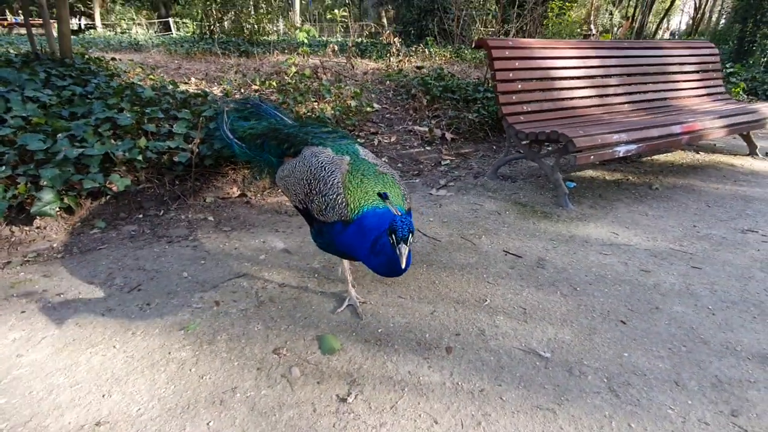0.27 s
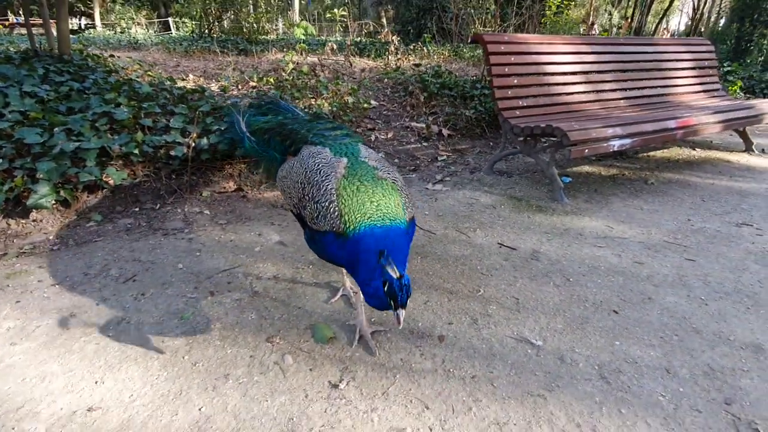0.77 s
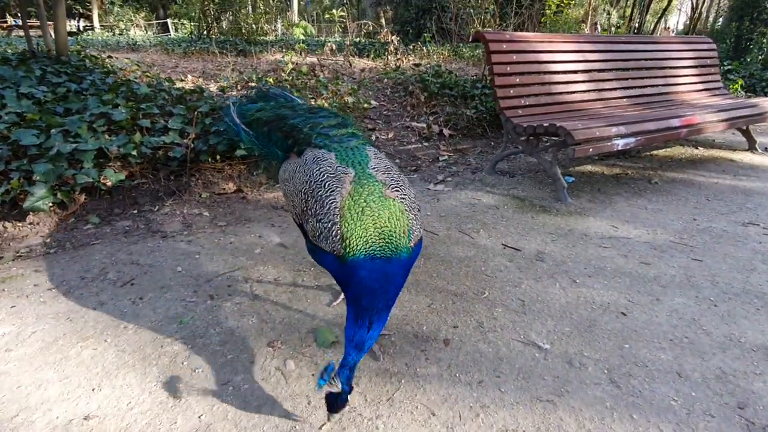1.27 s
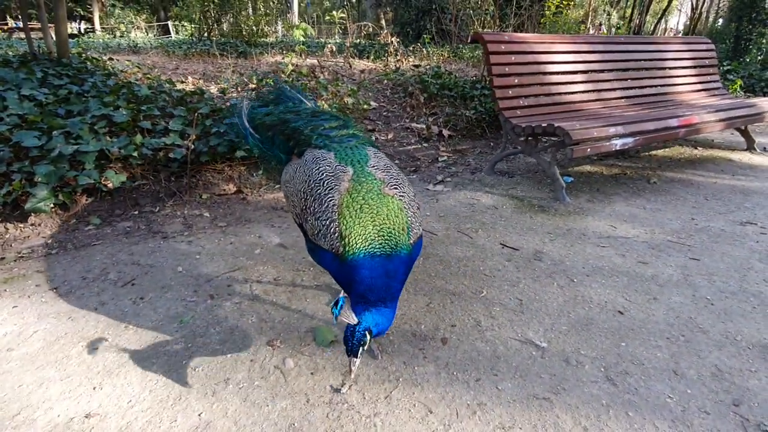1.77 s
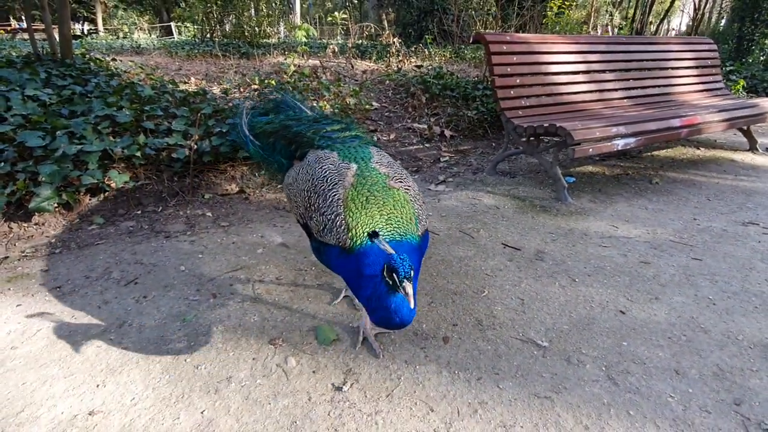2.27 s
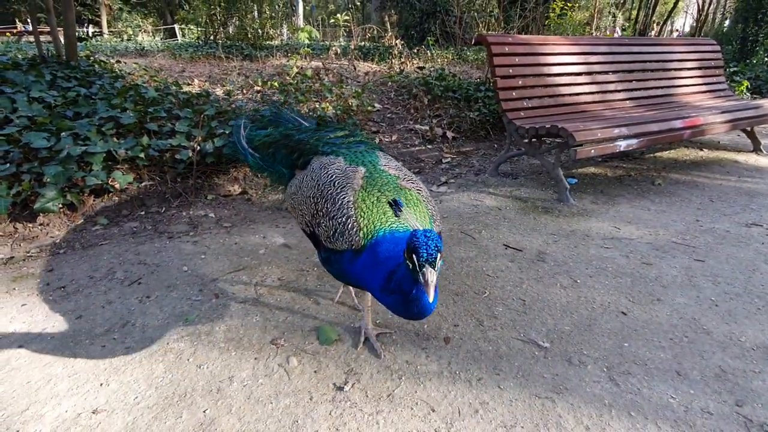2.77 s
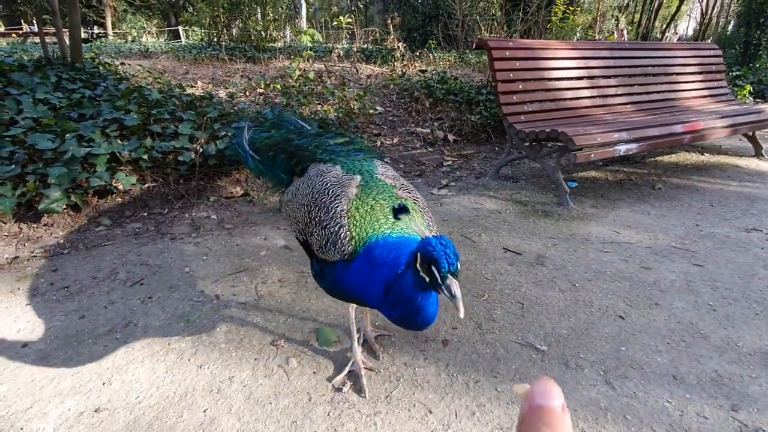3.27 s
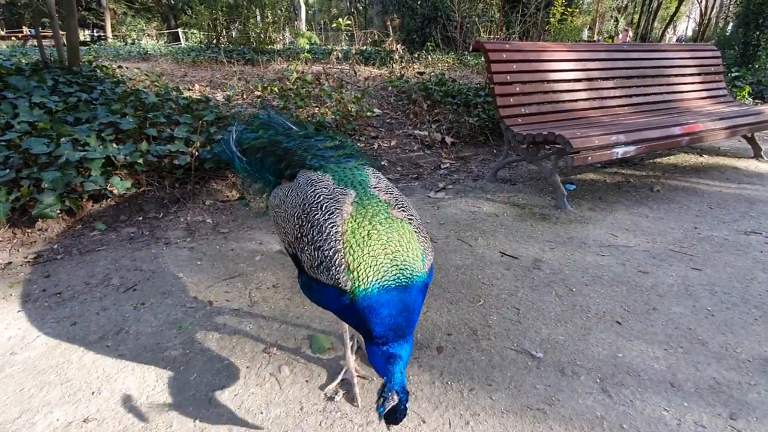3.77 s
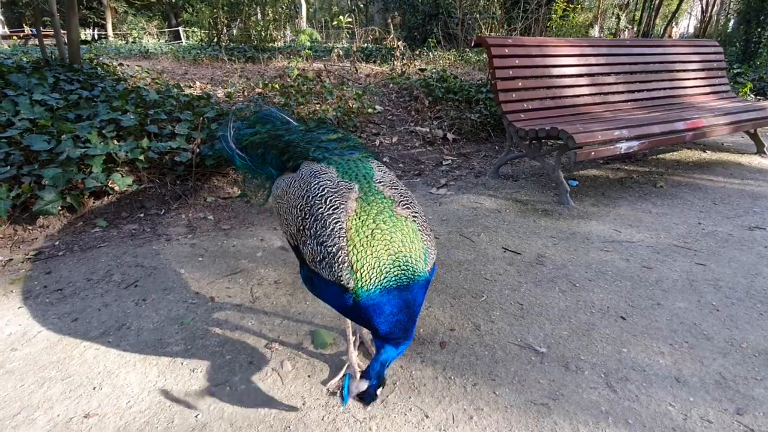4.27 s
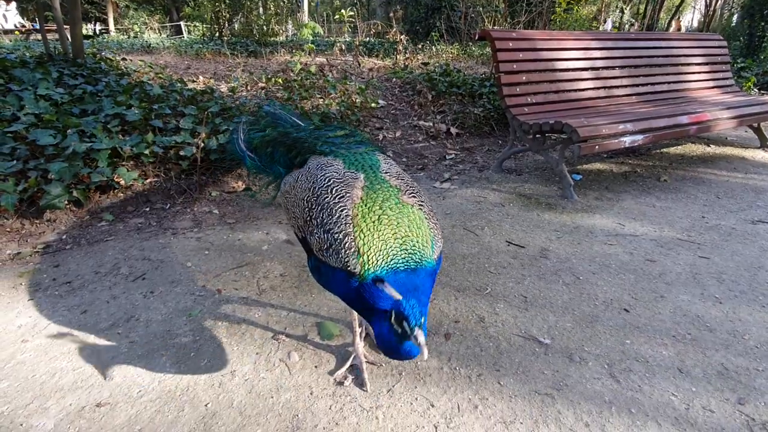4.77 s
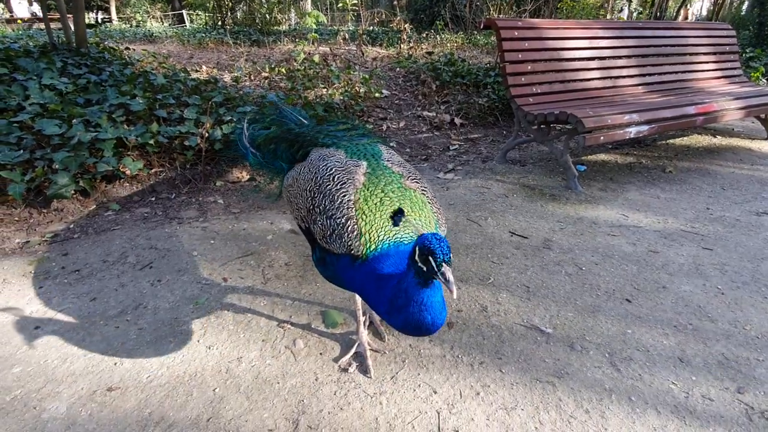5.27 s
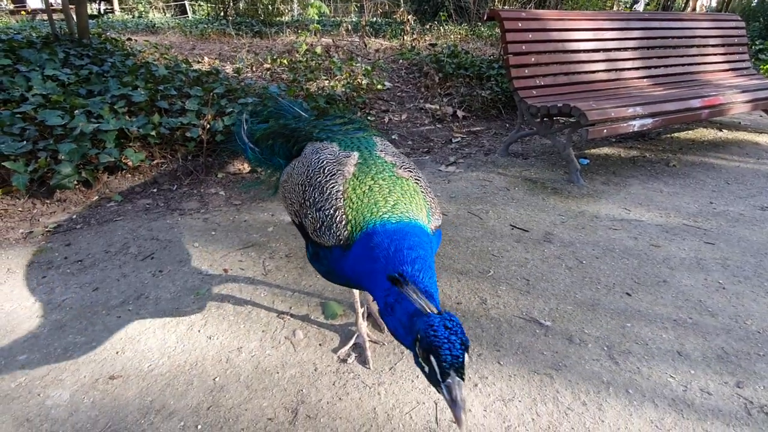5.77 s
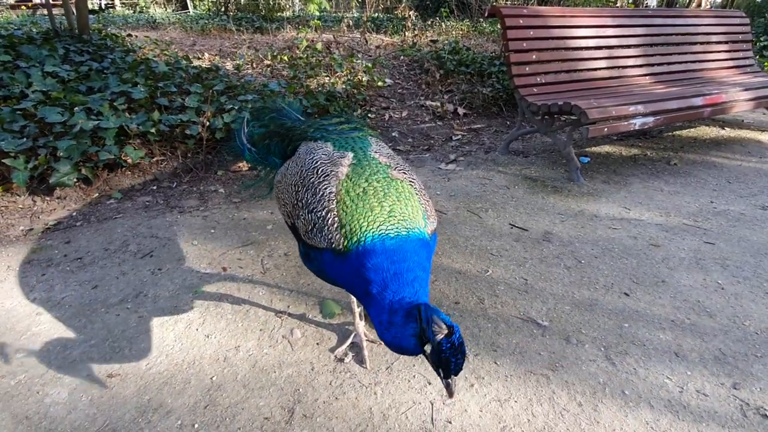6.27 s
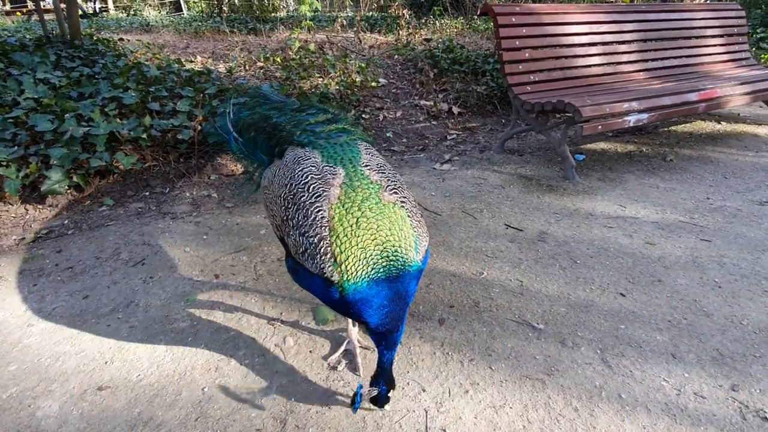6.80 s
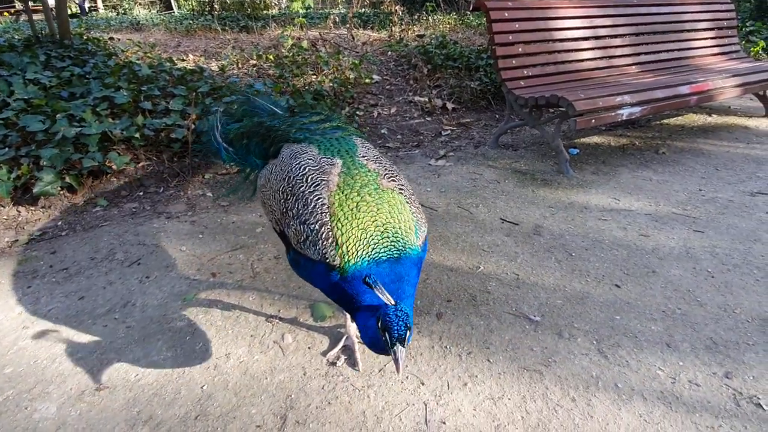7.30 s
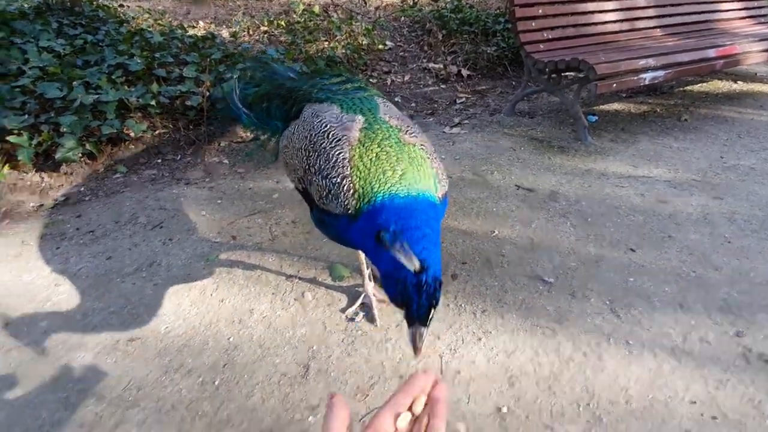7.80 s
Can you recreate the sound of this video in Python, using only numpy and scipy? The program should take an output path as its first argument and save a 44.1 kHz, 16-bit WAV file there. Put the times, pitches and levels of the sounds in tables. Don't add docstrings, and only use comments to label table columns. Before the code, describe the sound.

A calm park path with soft low traffic rumble and faint broad wash throughout, pulsing slightly. From 0 to 0.9 s a sleeve brushes airily close by, leaves stir, and distant small birds give a quick falling trill and short thin notes; a faint claw scrape and grit ticks come around 0.5 to 0.8 s. At 0.98 s one hard, dry nut crack stands out far above everything, with a tiny slap echo. From about 1.6 to 3 s it is quieter. A high chirp drops quickly onto a held pitch at 3.3 s, with a crisp tick at 3.5 s. A short woody beak tap lands at 4.5 s and a similar chirp follows at 5.6 s. Around 6.8 s claws scrape; from 7.2 s rustling swells, and an arching whistle at 7.5 to 7.9 s mixes with clustered seed ticks. Birds carry light tree echo.

```python
import sys
import numpy as np
from scipy import signal
from scipy.fft import rfft, irfft, next_fast_len
from scipy.io import wavfile
from scipy.ndimage import uniform_filter1d

SR = 44100
rng = np.random.default_rng(int(sys.argv[2]) if len(sys.argv) > 2 else 0)


def materialize(psi):
    bounded = np.clip(np.atleast_2d(psi).T, -1, 1)
    quanta = np.round(bounded * 32767).astype(np.int16)
    wavfile.write(sys.argv[1], SR, quanta)


def magnitude_from_level(level_db):
    exponent = np.asarray(level_db, float) / 20
    return 10 ** exponent


N = 354563


def evened(x):
    return x / np.sqrt(np.mean(x ** 2) + 1e-20)


def read(points, hz):
    f, value = np.transpose(points)
    return np.interp(np.log(hz + 1), np.log(f + 1), value)


def trace(curve, t):
    return np.interp(t, *np.transpose(curve))


def follow(curve, calm_db, share):
    return [(s, calm_db + share * db) for s, db in curve]


def add(mix, s, sound, pan_db):
    part = mix[:, round(s * SR):][:, :sound.shape[-1]]
    sides = magnitude_from_level(np.array([[pan_db / 2], [-pan_db / 2]]))
    part += (sides * sound)[:, :part.shape[1]]


def ring(x, hz, width):
    r = np.exp(-np.pi * width / SR)
    poles = [1, -2 * r * np.cos(2 * np.pi * hz / SR), r * r]
    return (1 - r * r) / 2 * signal.lfilter([1, 0, -1], poles, x)


def hiss(shape, level, band, alike, patchy_db, flicker_db, size):
    # pitch_hz, likeness
    likeness = [(30, 0.82), (80, 0.93), (150, 0.96), (300, 0.92), (600, 0.69), (1100, 0.48), (2000, 0.3),
                (3200, 0.076), (6000, 0.039)]
    # pitch_hz, left_minus_right_db
    side_tilt = [(60, -0.5), (150, 0), (380, -2), (950, -2.5), (2380, -3.0), (5980, -7), (15000, -6)]
    lag_s, edge_hz = 0.00031, 15830
    frames, hz = 4 * N // size + 5, np.fft.rfftfreq(size, 1 / SR)
    a, b, c, d, patches = rng.standard_normal((frames, len(hz), 5)).T
    patches = uniform_filter1d(patches, size // 80, 0)
    patches = evened(uniform_filter1d(patches, 8192 // size, 1))
    flicker = rng.standard_normal(frames)

    same = np.clip(alike * read(likeness, hz), 0, 1)[:, None]
    late = np.exp(-2j * np.pi * hz * lag_s)[:, None]
    right = a + 1j * b
    left = same * late * right + np.sqrt(1 - same ** 2) * (c + 1j * d)

    gain = magnitude_from_level(read(shape, hz)) * (hz >= shape[0][0]) * (hz < edge_hz)
    in_band = (hz >= band[0]) & (hz <= band[1])
    inside = (gain[in_band] ** 2).sum() / (gain ** 2).sum()
    z = np.array([left, right]) * gain[:, None] * magnitude_from_level(patchy_db * patches + flicker_db * flicker)
    tilt = read(side_tilt, hz)[:, None] / 2
    z = z * magnitude_from_level(np.array([tilt, -tilt]))
    noise = evened(signal.istft(z, nperseg=size, noverlap=3 * size // 4)[1][:, :N])
    return noise / np.sqrt(inside) * magnitude_from_level(trace(level, np.arange(N) / SR))


def whistle(s, hz, left_db, right_db, flutter_db):
    t = np.arange(s[0], s[-1], 1 / SR)
    flutter = uniform_filter1d(rng.standard_normal((2, SR // 2)), 150)
    flutter = evened(uniform_filter1d(flutter, 150))[:, :len(t)]
    glide = uniform_filter1d(np.interp(t, s, hz), 400, mode="nearest")
    phase = 2 * np.pi * np.cumsum(glide) / SR
    tone = np.sqrt(2) * np.sin(phase + np.array([[0], [1.2]]))
    edge = np.clip(np.minimum(t - s[0], s[-1] - t) / 0.0025, 0, 1)
    level_db = np.array([np.interp(t, s, left_db), np.interp(t, s, right_db)])
    return tone * edge * magnitude_from_level(level_db + flutter_db * flutter)


def swaying(u, hz, db, left_s, period_s, sway_db):
    pan_db = sway_db * np.cos(2 * np.pi * (u - left_s) / period_s) / 2
    return whistle(u, hz, db + pan_db, db - pan_db, flutter_db=4.2)


def traffic():
    # pitch_hz, level_db (per Hz)
    rumble_colour = [(12, -60), (20, -30), (29, -39), (36, -15), (46, -1), (60, 4.5), (74, 1), (103, -7),
                     (156, -19.5), (211, -33), (278, -29), (307, -25), (400, -36.5), (520, -57),
                     (880, -120)]
    wash_colour = [(120, 2), (200, -1), (278, -3.5), (373, -10), (529, -5), (579, -7.5), (683, -6.5),
                   (1160, -7.5), (1500, -11), (1840, -11.5), (2860, -20), (3830, -25.5), (5330, -33),
                   (10500, -44), (16000, -71)]
    # time_s, level_db (over the usual traffic)
    passing = [(0, 0.5), (.6, 3), (.9, -2.5), (1.3, 3), (1.55, -3.5), (2.2, 1), (2.8, -0.5), (3.6, 1.5),
               (4.4, -1), (5.3, 0), (5.9, -2.5), (6.6, 1.5), (7.2, 0.5), (8.04, -0.5)]
    rumble = hiss(rumble_colour, follow(passing, -38, 1), (20, 200),
                  alike=0.98, patchy_db=0.27, flicker_db=0.33, size=4096)
    wash = hiss(wash_colour, follow(passing, -49.02, 0.033), (300, 1500),
                alike=1.0, patchy_db=0.83, flicker_db=0.22, size=1024)
    return rumble + wash


def foliage():
    # pitch_hz, level_db
    leaf_colour = [(900, -23), (1600, -3), (2300, 0), (3500, -2.5), (5000, -5), (7000, -23.5), (8000, -37)]
    flock_colour = [(3500, -7), (5000, -3), (6300, 1), (7500, -2.5), (7900, -9.5), (9300, -8.5),
                    (10500, -24)]
    # time_s, level_db (over calm air)
    breeze = [(0, 5.5), (.2, 7.5), (.56, 6.5), (.9, 1), (1.2, 4), (1.8, -5), (2.5, -5), (3.05, 5.5),
              (3.45, 2.5), (3.7, 5.5), (4.9, -1.5), (5.5, 4), (6.2, -1.5), (6.83, 6.5), (7.1, 2.5),
              (7.3, 9), (7.65, 9), (8.04, 9)]
    leaves = hiss(leaf_colour, follow(breeze, -58, 0.58), (1800, 4500),
                  alike=0.27, patchy_db=2.0, flicker_db=0.65, size=256)
    flock = hiss(flock_colour, follow(breeze, -70.5, 1), (5800, 9500),
                 alike=0.3, patchy_db=0.5, flicker_db=2.5, size=256)
    return leaves + flock


def strokes():
    # start_s, length_s, level_db
    sweeps = [(1.0, .13, -72), (3.09, 0.18, -70), (3.362, 0.086, -72), (3.64, .26, -79), (4.235, .06, -67),
              (5.84, 0.2, -69.5), (6.46, .05, -80), (7.23, .25, -64), (7.897, .06, -66)]
    t = np.arange(N) / SR
    return sum(magnitude_from_level(db - 4.5 * (t - s) / length)
               * np.clip(np.minimum((t - s) / 0.004, (s + length - t) / 0.02), 0, 1)
               for s, length, db in sweeps)


def sleeve():
    # pitch_hz, level_db
    cloth_colour = [(3000, -25), (6000, -1), (8000, -5), (10000, -0.5), (12000, -2), (15800, -9)]
    # time_s, level_db
    arm = [(0, -72), (.11, -61.5), (.31, -65.5), (.42, -62.5), (.71, -72), (1.12, -80), (1.92, -91),
           (2.6, -91), (2.93, -76), (3.09, -69), (3.4, -82), (3.74, -78), (4.57, -90), (5.06, -86),
           (5.96, -81.5), (6.9, -82), (7.43, -64), (8.04, -69)]
    cloth = hiss(cloth_colour, [(0, 0)], (9000, 15500), alike=0.3, patchy_db=0.6, flicker_db=1.8, size=256)
    brushing = magnitude_from_level(2.5 + trace(arm, np.arange(N) / SR))
    return np.hypot(brushing, strokes()) * cloth


def far_birds():
    # length_s, level_db
    trill = [(.026, -57), (.026, -58), (.026, -57), (.014, -59)]
    # start_s, length_s, first_hz, last_hz, level_db
    drops = [(.001, .026, 5240, 4600, -58), (0.043, 0.036, 3080, 2730, -52), (.907, .022, 7000, 6300, -58),
             (1.493, 0.024, 4080, 3760, -59), (7.09, .03, 7850, 7650, -68), (7.12, 0.026, 7500, 6700, -63),
             (7.29, .025, 7850, 7600, -63), (7.303, .02, 7600, 6900, -66), (0.214, .11, 2200, 2510, -68)]
    # start_s, length_s, pitch_hz, level_db,
    # left_minus_right_db
    holds = [(.2, .016, 4350, -62, -7), (.085, .14, 2660, -58, -3), (.3, .059, 2650, -61, -2),
             (.505, .093, 3210, -60, 0), (.625, .035, 2840, -57, -6), (.709, .084, 2660, -61, -10),
             (.9, .055, 3100, -59, 0), (.931, .045, 2250, -58, -2), (1.042, .15, 2320, -63, -8),
             (.93, .049, 6550, -68, -8), (1.03, .06, 2700, -62, 1), (1.45, .015, 8600, -73, -5),
             (6.186, .045, 7450, -77, -10), (6.355, .04, 6250, -66, -5), (6.43, .02, 5450, -70, -3),
             (7.177, .074, 2720, -57, -2), (7.253, .024, 2380, -54, -2), (6.797, .045, 2960, -55, -3),
             (6.905, .05, 2200, -58, -3), (6.845, .02, 1800, -55, -3)]
    trill_s, step_s, top_hz, fall_hz_per_s = 0.085, 0.088, 5650, 52000
    notes = [(trill_s + k * step_s, length, top_hz, top_hz - fall_hz_per_s * length, db, -10)
             for k, (length, db) in enumerate(trill)]
    notes += [(s, length, first, last, db, -3) for s, length, first, last, db in drops]
    droop = 0.013
    notes += [(s, length, hz, (1 - droop) * hz, db, pan_db) for s, length, hz, db, pan_db in holds]
    out = np.zeros((2, N))
    for s, length, first_hz, last_hz, db, pan_db in notes:
        note = whistle((s, s + length), (first_hz, last_hz), (db, db), (db, db), flutter_db=2.5)
        add(out, s, note, pan_db)
    return out


def near_birds():
    # after_start_s, level_db
    effort = [(0, -6), (.018, 1), (.045, -13), (.11, -4), (.17, -1), (.205, 2), (.235, -9), (.33, -12),
              (.4, -16)]
    # start_s, level_db, drop_hz, first_strongest_left_s, sway_period_s
    chirps = [
        (3.265, -52, 650, 0.1, 0.2),
        (5.636, -51.5, 443, 0.075, 0.137),
    ]
    # time_s, pitch_hz, level_db
    arch = [(7.53, 2900, -62), (7.585, 3570, -52), (7.615, 3780, -55), (7.672, 3806, -55),
            (7.695, 3650, -51), (7.72, 3354, -49), (7.745, 3086, -48.5), (7.8, 2966, -53),
            (7.87, 2900, -68)]
    # first_strongest_left_s, sway_period_s, sway_db
    arch_sway = (.05, 0.074, 5.8)
    held_hz, sag_from_hz, sag_hz_per_s, drop_s = 4852, 5434, 3200, 0.017
    out = np.zeros((2, N))
    u = np.arange(0, effort[-1][0], 0.002)
    for s, db, drop_hz, left_s, period_s in chirps:
        sag_hz = np.maximum(sag_from_hz - sag_hz_per_s * u, held_hz)
        hz = sag_hz + drop_hz * np.exp(-u / drop_s)
        add(out, s, swaying(u, hz, db + trace(effort, u), left_s, period_s, sway_db=6), 0)
    s, arch_hz, arch_db = np.transpose(arch)
    t = np.arange(s[0], s[-1], 0.002)
    add(out, s[0], swaying(t - s[0], np.interp(t, s, arch_hz), np.interp(t, s, arch_db), *arch_sway), 0)
    return out


def ticks():
    # start_s, peak_db, ring_hz, snap_db, left_minus_right_db
    seeds = [(.59, -38, 2000, -63, -9), (0.674, -48, 6000, -58, -6), (.691, -42, 2600, -59, -6),
             (.733, -48, 6000, -60, -6), (.802, -39.5, 4270, -59, -19), (1.21, -54, 3500, -65, -6),
             (1.514, -53, 7000, -66, -4), (3.132, -52, 4000, -51, -2), (3.363, -67, 9000, -65, -8),
             (3.5313, -37, 4400, -37.5, -4), (4.237, -43, 5000, -60, -6), (6.292, -39.5, 4280, -47, -2),
             (6.47, -54, 7000, -65, -4), (6.889, -44, 3000, -61, -3), (7.087, -54, 7500, -60, -3),
             (7.697, -50, 2500, -43, 2), (7.706, -36, 5860, -45, -4), (7.727, -34.5, 5770, -42, -11),
             (7.727, -34, 2250, -52, -1), (7.805, -35, 4850, -50, -5), (7.813, -38, 2300, -63, 1),
             (7.826, -40, 4600, -37, -2), (8.022, -46, 5500, -41, -6)]
    out, t = np.zeros((2, N)), np.arange(600) / SR
    bursts = rng.standard_normal((len(seeds), 2, len(t))) * (1 - np.exp(-t / 0.00013))
    for (s, db, hz, snap_db, pan_db), burst in zip(seeds, bursts):
        burst = burst + 0.68 * burst[::-1]
        width = 750 + 0.15 * hz
        body = ring(ring(burst * np.exp(-t / 0.003), hz, width), hz, 2 * width)
        snap = ring(burst * np.exp(-t / 0.0013), 6000, 14000)
        add(out, s, magnitude_from_level(db) * body / abs(body).max() + magnitude_from_level(snap_db) * snap / abs(snap).max(), pan_db)
    peck_s, peck_db, peck_hz, peck_t60_s = 4.5198, -22.5, 1250, 0.0049
    tap = magnitude_from_level(peck_db - 60 * t / peck_t60_s) * np.sin(2 * np.pi * peck_hz * t)
    add(out, peck_s, tap * (1 - np.exp(-t / 0.00022)), -3)
    return out


def claw():
    # start_s, length_s, grit_db, squeal_hz, squeal_db
    scrapes = [(.5, .11, -53, 4700, -60), (6.792, .08, -52, 2930, -50), (6.795, .08, -58, 5400, -61),
               (6.86, .08, -60, 2900, -64), (4.22, .06, -56, 2300, -68), (7.28, .09, -59, 2400, -66),
               (7.09, .09, -68, 7300, -70)]
    # pitch_hz, width_hz, level_db
    stone = [(2000, 480, -2), (3660, 710, -1), (5200, 900, 0.5), (6200, 620, -2.5)]
    out = np.zeros((2, N))
    for s, length, grit_db, hz, squeal_db in scrapes:
        count = round(length * SR)
        slips = rng.standard_normal((2, SR // 4)) * (rng.random((2, SR // 4)) < 3000 / SR)
        slips = slips[:, :count]
        grit = sum(magnitude_from_level(db) * evened(ring(ring(slips, mode_hz, width), mode_hz, width))
                   for mode_hz, width, db in stone)
        squeal = evened(ring(ring(slips, hz, 170), hz, 170))
        scrape = magnitude_from_level(grit_db) * evened(grit) + magnitude_from_level(squeal_db) * squeal
        add(out, s, scrape * signal.windows.tukey(count, 0.3), -3)
    return out


def nut():
    # pitch_hz, t60_s, left_db, right_db, sign
    modes = [(714, .0035, -11, -1.5, 1), (1184, .0033, 4.5, 4, 1), (1889, .0061, -40, 0, 1),
             (2019, .0032, 8.8, 13.6, -1), (2606, .0042, -30, 3.6, 1), (1100, .02, -27, -30, 1),
             (2250, .013, -17, -22, 1), (3700, .004, -16, -12, 1), (5050, .004, -19, -15, -1),
             (6700, .003, -20, -2, -1)]
    nut_s, blow_s, bench_s = 0.97925, 0.001, 0.0086
    out, t = np.zeros((2, N)), np.arange(2000) / SR
    shell = sum(sign * magnitude_from_level(np.array([[left_db], [right_db]]) - 60 * t / t60) * np.sin(2 * np.pi * hz * t)
                for hz, t60, left_db, right_db, sign in modes)
    crack = ring(rng.standard_normal((2, len(t))), 8200, 10000)
    shell = shell + crack * magnitude_from_level(np.array([[-16], [-5]]) - 60 * t / 0.0032)
    shell = shell * (1 - np.exp(-(t / blow_s) ** 2))
    add(out, nut_s, shell, 0)
    add(out, nut_s + bench_s, magnitude_from_level(-22) * shell, 0)
    return out


def trees(x):
    # pitch_hz, t60_s
    decay = [(1000, 0.77), (3000, 0.88), (5000, 0.52), (9000, 0.56)]
    taps = np.zeros((2, SR))
    at = np.arange(700, SR - 20, 20)
    at = at + rng.integers(0, 20, (2, len(at)))
    np.put_along_axis(taps, at, rng.choice([-1., 1.], at.shape), 1)
    hz, t, z = signal.stft(taps, SR, nperseg=256)
    tail = signal.istft(z * magnitude_from_level(-60 * t / read(decay, hz)[:, None]), SR, nperseg=256)[1]
    return signal.fftconvolve(x, tail / np.linalg.norm(tail[0]), axes=1)[:, :N]


def scene():
    hits = ticks() + claw() + nut()
    near, far = near_birds(), far_birds()
    echo = trees(magnitude_from_level(-26) * hits + magnitude_from_level(-6) * near + magnitude_from_level(-7) * far)
    return traffic() + foliage() + sleeve() + hits + near + far + echo


def low_pass(x):
    return signal.sosfilt(signal.butter(12, 16510, fs=SR, output="sos"), x)


def record(dry):
    # pitch_hz, level_db
    port = [(7000, 0), (7550, 0.5), (8000, -2.5), (8700, -0.5), (9800, -1.5), (10300, -5), (11500, -0.5)]
    size = next_fast_len(N)
    hz = np.fft.rfftfreq(size, 1 / SR)
    colour = magnitude_from_level(read(port, hz)) / (1 + (hz / 16050) ** 60)
    mix = irfft(rfft(dry, size) * colour, size)[:, :N]
    return low_pass(mix)


dry = scene()
out = record(dry)
materialize(out)
```